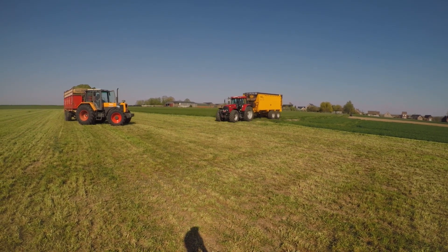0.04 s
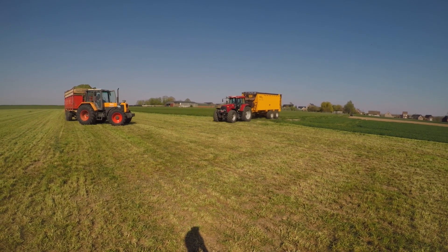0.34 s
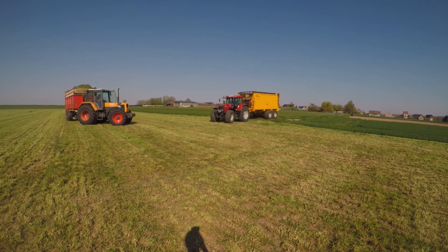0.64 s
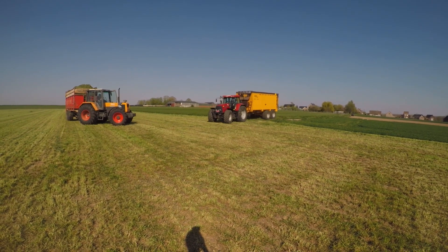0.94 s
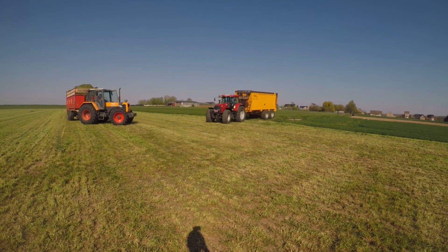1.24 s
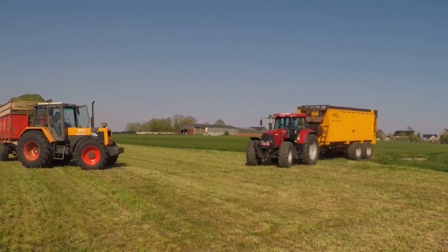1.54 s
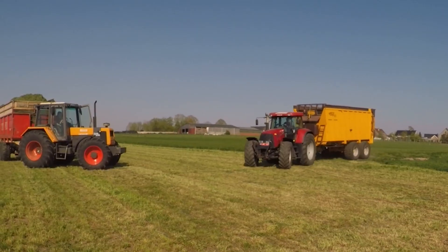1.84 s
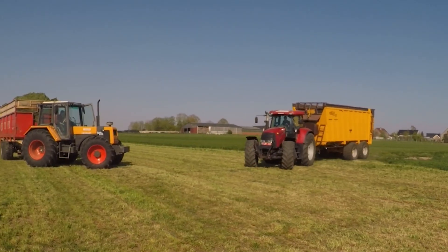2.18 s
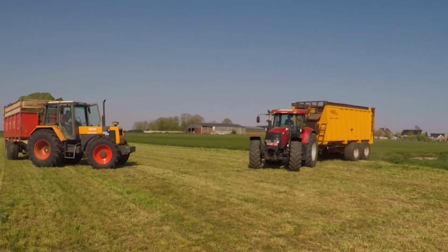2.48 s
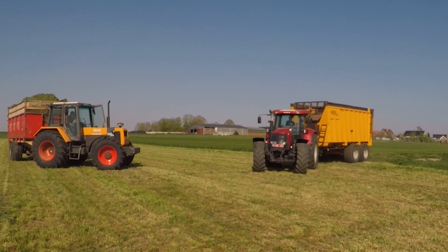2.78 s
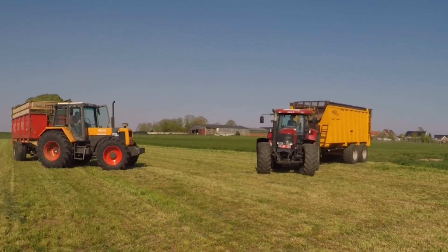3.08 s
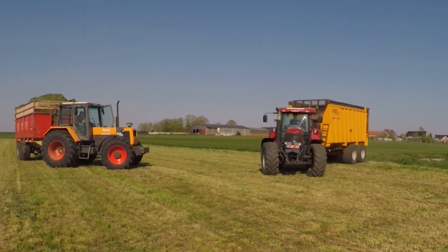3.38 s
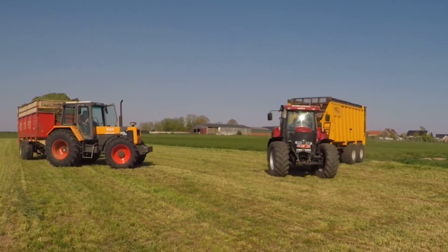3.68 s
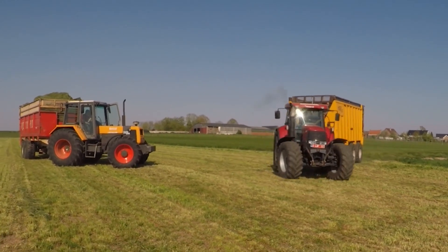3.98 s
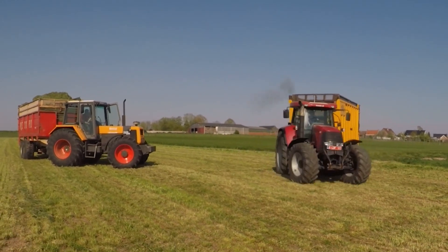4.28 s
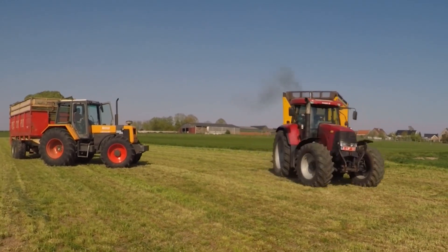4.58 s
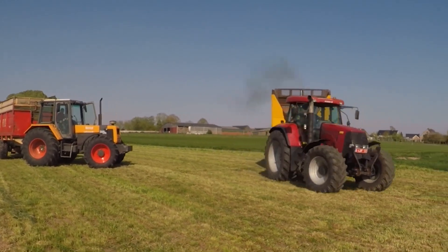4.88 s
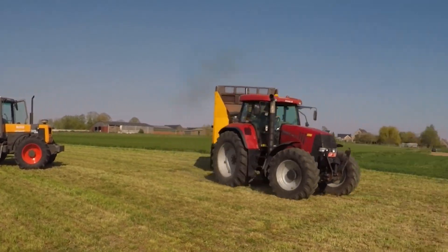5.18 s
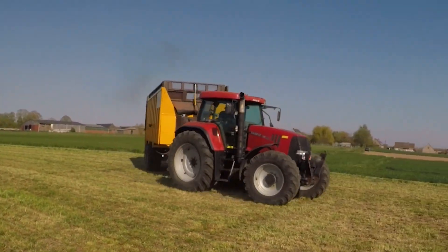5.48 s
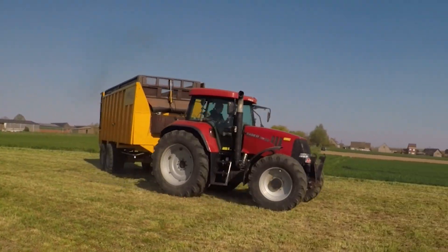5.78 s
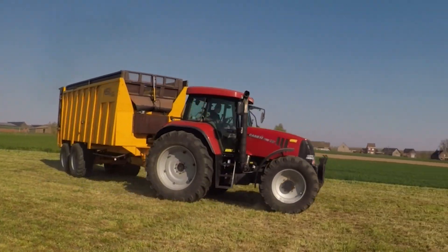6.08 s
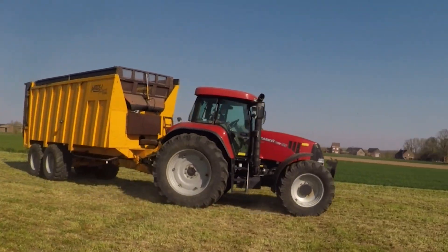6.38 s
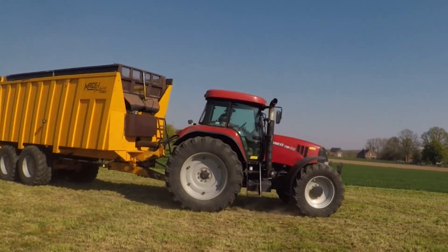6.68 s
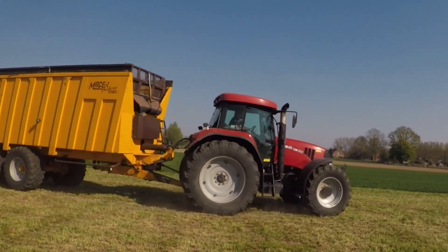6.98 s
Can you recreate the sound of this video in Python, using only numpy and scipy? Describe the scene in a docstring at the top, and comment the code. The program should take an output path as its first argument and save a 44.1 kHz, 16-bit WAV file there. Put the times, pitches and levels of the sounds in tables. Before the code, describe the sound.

Gusty wind thumps on a small outdoor microphone over the deep boom of an approaching tractor and the steady idle of another. After some short, hissing scuffs, the moving tractor accelerates: its engine climbs in pitch and loudness, the turbo hisses and whistles faintly, and the gears whine. Finally it drives close past over the mown field, with engine clatter and a soft swish of tyres.

```python
"""A deep engine boom revs up and passes close by: a six-cylinder diesel tractor pulling a trailer over a mown field.
Its exhaust booms each time a cylinder fires, the engine block clatters and the gears whine.
As it works harder, its turbocharger (a fan spun by exhaust gas) hisses and whistles; tyres swish past.
A second tractor idles nearby, wind rumbles in the housing of a small camera,
and a few short, ringing hisses, like scuffs in grass, sound early on."""
import sys
import numpy as np
from scipy import signal
from scipy.fft import rfft, irfft
from scipy.io import wavfile
from scipy.ndimage import uniform_filter1d, minimum_filter1d

SR = 44100
rng = np.random.default_rng(int(sys.argv[2]) if len(sys.argv) > 2 else 0)


def digitize_waveform(pressure):
    """Quantize a signal to 16-bit integers and store it at the path in sys.argv[1].

    Rows of a 2-D input are taken as channels; values are limited to [-1, 1].
    """
    field = np.atleast_2d(pressure).T
    bounded = np.clip(field, -1, 1)
    quanta = np.round(bounded * 32767).astype(np.int16)
    wavfile.write(sys.argv[1], SR, quanta)


N = 314433
T = np.arange(N) / SR
FREQ = np.maximum(np.fft.rfftfreq(N, 1 / SR), 1)
PASSES_S, NEAREST_M, SPEED_M_S = 6.35, 6.58, 2.92  # when, how close and how fast the tractor passes
LOW_MESH, MID_MESH, HIGH_MESH = 20.03, 20.7, 30.7  # teeth that meet per firing in three gear pairs

# ringing of the bonnet and exhaust pipe (frequency [Hz], width [Hz], gain [dB])
PANEL_RINGS = [(1640, 260, 1), (2900, 140, 0), (3410, 200, -0.5), (3960, 200, 1.5), (4590, 200, 2),
               (5560, 220, 2)]


def undb(db):
    """Turn decibels into a factor to multiply by."""
    return 10 ** (np.asarray(db) / 20)


def unit(x):
    """Scale a signal to an average strength (rms) of 1."""
    return x / np.sqrt(np.mean(x ** 2))


def curves(table):
    """Join a table's rows by straight lines in time: one curve for each column after the first."""
    times, *columns = np.transpose(table)
    return [np.interp(T, times, column) for column in columns]


def swell(start, end, fade):
    """A loudness curve that fades in, holds and fades out; times are in seconds."""
    return np.clip(np.minimum(T - start, end - T) / fade, 0, 1)


def noise():
    """White noise: an even hiss."""
    return rng.standard_normal(N)


def tone(hz):
    """A pure tone of strength 1 that follows a pitch curve."""
    return np.sqrt(2) * np.sin(2 * np.pi * np.cumsum(hz) / SR)


def shape(x, spectrum):
    """Make lows and highs louder or softer along (frequency [Hz], gain [dB]) points."""
    hz, db = np.transpose(spectrum)
    return irfft(rfft(x) * undb(np.interp(np.log(FREQ), np.log(hz), db)), N)


def colour(x, spectrum):
    """Shape a sound's lows and highs, then bring it to strength 1."""
    return unit(shape(x, spectrum))


def resonate(x, bells):
    """Lift or lower bell-shaped bands of frequencies."""
    db = sum(gain * np.exp(-2 * ((FREQ - hz) / width) ** 2) for hz, width, gain in bells)
    return irfft(rfft(x) * undb(db), N)


def wander(rate):
    """A smooth random curve of strength 1 that moves about `rate` times a second."""
    steps = 8192
    hz = np.fft.rfftfreq(steps, T[-1] / steps)
    slow = irfft(rfft(rng.standard_normal(steps)) / (1 + (hz / rate) ** 4))
    return unit(np.interp(T, np.linspace(0, T[-1], steps), slow))


def drive_past():
    """The passing tractor's distance in metres and its angle from side-on in degrees."""
    along = SPEED_M_S * (T - PASSES_S)
    return np.hypot(along, NEAREST_M), np.degrees(np.arctan2(along, NEAREST_M))


def firings(cycle, decay, scatter_db):
    """A loudness curve that jumps at each firing and dies away; no two firings are equally strong."""
    strength = undb(scatter_db * rng.standard_normal(N))[cycle.astype(int)]
    return unit(strength * np.exp(-(cycle % 1) / decay))


def exhaust(cycle, metres, bay):
    """The silencer leaves a nearly pure boom; unequal cylinders add weak tones around it."""
    # loudness of the boom (time [s], level [dB])
    boom_levels = [(0, -16), (1.15, -16.5), (1.35, -14), (2.55, -14), (3.6, -10.6), (4.3, -9), (5.3, -9.5),
                   (5.65, -11), (5.95, -9), (6.18, -12.5), (6.5, -10), (7.13, -12)]
    # the rasp, an octave higher (time [s], base level relative to the boom [dB])
    rasp_levels = [(0, -23), (3.8, -20.5), (4.45, -23.5), (5.05, -30), (5.9, -24), (7.13, -19.5)]
    # tones from unequal cylinders (multiple of the firing rate, level relative to the boom [dB])
    weak_tones = [(.5, -23.5), (1.5, -31), (3, -35)]
    boom_db, = curves(boom_levels)
    rasp_db, = curves(rasp_levels)
    phase = 2 * np.pi * cycle
    waver_db = 0.0347 * metres * wander(9.1)  # moving air: a longer path wavers more
    boom = np.sin(phase) * undb(waver_db)
    rasp = np.sin(2 * phase + 1) * undb(rasp_db + 10.5 * bay + 2.7 * wander(13))
    weak = sum(np.sin(multiple * phase + rng.uniform(0, 2 * np.pi)) * undb(db + 2.2 * wander(1.9))
               for multiple, db in weak_tones)
    return np.sqrt(2) * (boom + rasp + weak) * undb(boom_db)


def block_clatter(cycle, metres, bay):
    """Burning fuel knocks the engine block over the fan's even rush; both weaken with distance."""
    # tone colour of the block (frequency [Hz], relative level [dB])
    block_spectrum = [(120, -3), (230, 16.5), (390, 9.5), (500, 2.5), (750, 0.5), (1000, -6), (1600, 0),
                      (2200, -1.5), (3100, -6), (4300, -8), (5500, -16.5), (9000, -23), (14000, -27)]
    knocks = noise() * firings(cycle, decay=0.29, scatter_db=4.5)
    fan = noise()
    clatter = resonate(colour(fan + undb(-8) * knocks, block_spectrum), PANEL_RINGS)
    throttle_db = 1.45 * swell(3.265, 5.31, fade=0.37)  # an open throttle knocks harder
    level_db = -35.5 + throttle_db + 3.5 * bay + 0.38 * wander(11)
    return clatter * undb(level_db) * NEAREST_M / metres


def over_ground(x):
    """An echo off the field mixes with the direct sound; as its delay grows, the tone colour sweeps down."""
    # the echo (time [s], delay [ms], gain [dB])
    bounce = [(3.4, 1.9, -15.5), (3.67, 1.57, -12), (4.05, 1.9, -3), (4.4, 1.88, -8), (4.7, 1.95, -8),
              (5.1, 2.2, -11), (5.7, 2.6, -13), (7.13, 2.9, -12.5)]
    # grass scatters the echo's highest part (frequency [Hz], gain [dB])
    grass_spectrum = [(5500, 4.5), (7500, 1), (10000, -11)]
    delay_ms, echo_db = curves(bounce)
    delay_ms = delay_ms + .012 * wander(6)  # bumps in the field
    finer = signal.resample_poly(shape(x, grass_spectrum), 4, 1)  # extra samples for a smooth slide
    echo = np.interp(T - delay_ms / 1000, np.arange(4 * N) / (4 * SR), finer)
    return unit(x + undb(echo_db) * echo)


def turbo_hiss(cycle, bay):
    """Gas hisses through the turbocharger, surging at each firing; it sizzles briefly while spinning up."""
    # the hiss follows how hard the engine works (time [s], base level [dB])
    hiss_levels = [(0, -57), (2.9, -58), (3.5, -51.5), (3.7, -44), (4.6, -40), (5, -42), (5.6, -48.5),
                   (6.1, -42), (7.13, -43)]
    # tone colour of the broad hiss (frequency [Hz], relative level [dB])
    hiss_spectrum = [(1500, -7), (2400, -3.5), (3300, -8), (4600, 1.5), (6000, 2), (7500, -0.5),
                     (8700, 1.5), (10000, -1), (12500, -2.5), (15000, -16.5)]
    # tone colour of the narrow sizzle (frequency [Hz], relative level [dB])
    sizzle_spectrum = [(6500, -30), (7600, -10), (8100, 9), (8700, -9), (10000, -33)]
    hiss_db, = curves(hiss_levels)
    surges = unit(1 + .65 * firings(cycle, decay=.28, scatter_db=2))
    gas = resonate(colour(noise() * surges, hiss_spectrum), PANEL_RINGS)
    hiss = over_ground(gas) * undb(hiss_db + 3 * bay + 0.56 * wander(4.9))
    sizzle = colour(noise() * surges, sizzle_spectrum) * swell(3.6, 4.3, fade=.16) * undb(-51)
    return hiss + sizzle


def gear_whine(firing_hz):
    """Gear teeth sing as they meet under load; the uneven turning force shakes their pitch and level."""
    # each whine (multiple of the firing rate, start [s], end [s], level [dB])
    whines = [(HIGH_MESH, .1, .42, -55.5), (HIGH_MESH, .55, 1.32, -55), (HIGH_MESH, 1.45, 1.95, -55),
              (HIGH_MESH, 2.17, 2.52, -57), (HIGH_MESH, 2.8, 3.68, -54), (HIGH_MESH, 5.3, 6.4, -60),
              (LOW_MESH, 0, .8, -59.5), (LOW_MESH, 4.36, 4.53, -45), (LOW_MESH, 5.3, 7.2, -53),
              (MID_MESH, 1, 2, -55), (MID_MESH, 4.03, 5.3, -52.5), (20.45, 4.78, 4.96, -45),
              (9.25, 2.7, 3.6, -60), (8.7, 3.3, 3.9, -57), (6.67, 5.2, 6.2, -54), (8, 5, 6, -57),
              (33.7, 6.2, 6.8, -56)]
    steady_hz = uniform_filter1d(firing_hz, size=SR // 3, mode="nearest")  # the flywheel evens out speed
    out = 0
    for multiple, start, end, db in whines:
        whine = tone(multiple * steady_hz * (1 + .0035 * wander(40)))
        out = out + whine * swell(start, end, fade=.08) * undb(db + 2.5 * wander(14))
    return out


def wind():
    """Swirling air buffets the camera and rings the air in its housing; the open field hisses softly."""
    # the rumble drops in a lull and comes back (time [s], base level [dB])
    rumble_levels = [(0, -22.5), (2.5, -23), (3.6, -25), (4.8, -33), (5.7, -24), (6.3, -22), (7.13, -21.5)]
    # gusts (peak time [s], half-length [s], change in rumble [dB], rise in buffeting [dB])
    gusts = [(0.78, .05, 5, 4), (1.018, .08, 1.5, 7), (1.402, .06, 2, 13), (1.83, .12, 1.5, 17),
             (2.13, .08, .5, 15), (2.536, .08, 5, 10), (3.079, .06, -2, 17), (5.635, .05, 3.5, 3),
             (6.2, 0.061, 4.5, 0), (6.85, .16, -2.5, 5)]
    # tone colour of the rumble in the housing (frequency [Hz], relative level [dB])
    rumble_spectrum = [(15, -12), (30, -20.5), (45, 4.5), (75, -0.5), (110, 3), (150, -4.5), (200, -8.5),
                       (240, -13.5), (290, -22.5), (400, -27.5), (520, -40.5), (900, -54.5)]
    # ringing of the air in the housing (frequency [Hz], width [Hz], gain [dB])
    housing_rings = [(137, 33, 2.5), (237, 14.5, 5.5)]
    # tone colour of the very deep buffeting (frequency [Hz], relative level [dB])
    buffet_spectrum = [(2, -22), (8, 10.5), (16, 7), (28, 8), (50, -17), (100, -56.5)]
    # tone colour of the field's hiss (frequency [Hz], relative level [dB])
    field_spectrum = [(500, -6), (850, 14), (1400, 11), (2500, -1), (3400, -9), (4100, 3.5), (5300, -8.5),
                      (7000, -2), (8100, 0), (10000, -2.5), (13000, -4), (15000, -10)]
    rumble_db, = curves(rumble_levels)
    buffet_db = -34.5
    for peak, half_length, rumble_change_db, buffet_rise_db in gusts:
        gust = np.exp(-((T - peak) / half_length) ** 2)
        rumble_db = rumble_db + rumble_change_db * gust
        buffet_db = buffet_db + buffet_rise_db * gust
    rumble = unit(resonate(colour(noise(), rumble_spectrum), housing_rings)) * undb(rumble_db)
    buffet = colour(noise(), buffet_spectrum) * undb(buffet_db)
    field_hiss = colour(noise(), field_spectrum) * undb(-47 + 1.1 * wander(5))
    return rumble + buffet + field_hiss


def parked_tractor():
    """A second tractor idles nearby: a stack of low tones that waver in the moving air."""
    # tones of the idling engine (multiple of the firing rate, base level [dB])
    idle_tones = [(1, -32.5), (2, -53), (3, -29.5), (4, -38), (5, -34), (6, -56), (7, -52)]
    # the camera swings away from this tractor (time [s], gain [dB])
    facing_gains = [(0, 1), (2.6, -2), (3.6, -3.5), (4.6, -6), (5.5, -3.5), (7.13, -2.5)]
    facing_db, = curves(facing_gains)
    firing_hz = 43.53 * (1 + 0.007 * wander(7.2))
    phase = 2 * np.pi * np.cumsum(firing_hz) / SR
    drone = sum(np.sin(multiple * phase + rng.uniform(0, 2 * np.pi)) * undb(db + 2.42 * wander(6.7))
                for multiple, db in idle_tones)
    return np.sqrt(2) * drone * undb(facing_db)


def short_hisses():
    """A few short, ringing hisses, like scuffs in grass: each rises quickly, holds and dies away."""
    # each hiss (start [s], hold [s], level [dB], centre frequency [Hz], width [octaves])
    hisses = [(0.532, 0.0255, -53, 4472, 1.02), (1.585, 0.0314, -44, 3887, 0.3),
              (2.067, 0.027, -41, 3740, 0.24), (2.367, 0.02285, -43, 3500, 1.1),
              (2.446, 0.024, -35.5, 2480, 1.2)]
    # ringing of the hisses (frequency [Hz], width [Hz], gain [dB])
    hiss_rings = [(1800, 250, 7), (2600, 200, 6), (4760, 250, 1.5), (6900, 350, 1)]
    rise_s, tail_s = 0.0029, 0.024
    broad = 0.145 / (1 + (np.log2(FREQ / 5500) / 0.69) ** 4)  # a wide band shared by all the hisses
    out = 0
    for start, hold, db, hz, octaves in hisses:
        peak = 1 / (1 + (np.log2(FREQ / hz) / octaves) ** 2)
        hiss = irfft(rfft(noise()) * (peak + broad), N)
        rise = np.clip((T - start) / rise_s, 0, 1)
        tail = np.exp(-np.maximum(T - start - hold, 0) / tail_s)
        out = out + unit(resonate(hiss, hiss_rings)) * rise * tail * undb(db)
    return out


def turbo_whistle():
    """The turbocharger's fast-spinning blades give a high, flickering whistle while it works hard."""
    # pitch of the blades (time [s], frequency [Hz])
    blade_pitches = [(4.4, 6864), (4.72, 7480), (4.95, 7755), (5.15, 7697), (5.65, 6974), (5.9, 6700),
                     (6.6, 6693)]
    hz, = curves(blade_pitches)
    whistle = tone(hz * (1 + .003 * wander(120)))
    flicker = unit(.7 + wander(45))
    return whistle * flicker * swell(4.45, 6.7, fade=.2) * undb(-54.5)


def tyre_swish(off_deg):
    """The treads brush through dry stubble, heard only as the wheels come side-on."""
    # tone colour of the stubble (frequency [Hz], relative level [dB])
    stubble_spectrum = [(900, -7.5), (2500, -2), (3500, 2), (5500, 1), (9000, 1.5), (12000, 5.5),
                        (15000, -2.5)]
    swish_db = -40.5 - 10 * (off_deg / 30) ** 2  # 10 dB softer at 30 degrees from side-on
    return colour(noise(), stubble_spectrum) * undb(swish_db + 1.4 * wander(60))


def limiter(x, ceiling_db=-4.5, hold_s=.04):
    """Turn the volume down smoothly around every peak that would pass the ceiling."""
    window = int(hold_s * SR)
    gain = np.minimum(1, undb(ceiling_db) / (np.abs(x) + 1e-9))
    held_gain = minimum_filter1d(gain, size=window)
    return x * uniform_filter1d(held_gain, size=window)


def scene():
    """Mix the passing tractor, paced by its firing rate, with short hisses, wind and the parked tractor."""
    # engine speed (time [s], firing rate [Hz])
    engine_speeds = [(0, 63.5), (0.3, 62.67), (1.15, 65.86), (2.05, 67.02), (2.35, 70.16), (2.64, 65.2),
                     (2.9, 69.6), (3.35, 69.5), (3.85, 75.64), (4.2, 83.23), (4.75, 91.7), (5, 93.63),
                     (5.76, 94.57), (6.05, 96.5), (6.75, 97.57), (7.13, 95.35)]
    firing_hz, = curves(engine_speeds)
    cycle = np.cumsum(firing_hz) / SR  # counts the firings so far
    metres, off_deg = drive_past()
    # rises to 1 as the engine bay's open side faces the listener, lifting rasp, clatter and hiss
    bay = np.exp(-(off_deg / 5.9) ** 2)
    engine = exhaust(cycle, metres, bay) + block_clatter(cycle, metres, bay)
    turbo = turbo_hiss(cycle, bay) + turbo_whistle()
    tractor = engine + turbo + gear_whine(firing_hz) + tyre_swish(off_deg)
    return (tractor + short_hisses() + wind() + parked_tractor())[None]


def record(dry):
    """The housing hollows the middle and dulls the highs, a limiter tames peaks, and the very top is cut."""
    # bands that the microphone picks up weakly (frequency [Hz], width [Hz], gain [dB])
    midrange_dips = [(438.3, 15, -13.5), (566.6, 63, -10.5), (1113.7, 165, -8.5)]
    # the microphone's loss of high sounds (frequency [Hz], gain [dB])
    treble_loss = [(8500, 0), (10000, -5), (11300, -14), (12700, -13), (14000, -14.5), (15000, -17.5)]
    faded = dry[0] * swell(0, T[-1], fade=.002)
    heard = limiter(shape(resonate(faded, midrange_dips), treble_loss))
    top_hz = 15200
    top_cut = signal.ellip(8, .2, 80, top_hz, fs=SR, output="sos")
    return signal.sosfilt(top_cut, heard)[None]


dry = scene()
out = record(dry)
digitize_waveform(out)
```